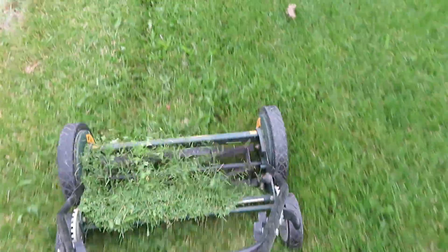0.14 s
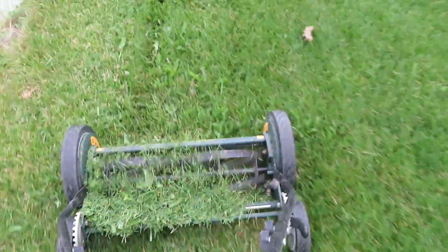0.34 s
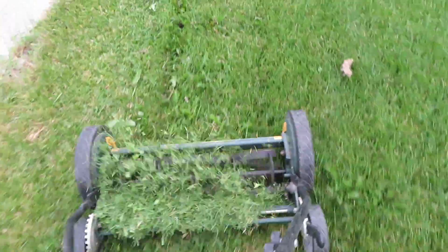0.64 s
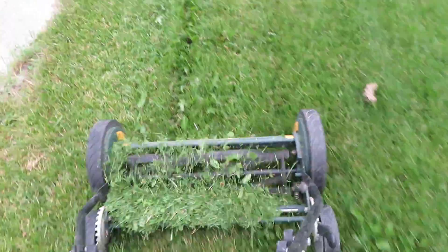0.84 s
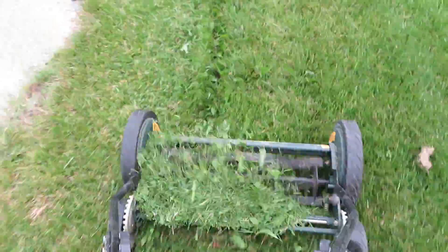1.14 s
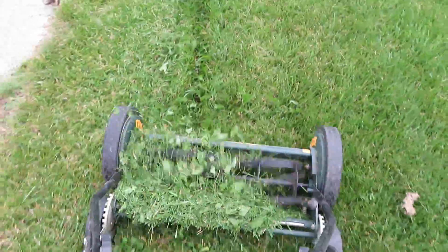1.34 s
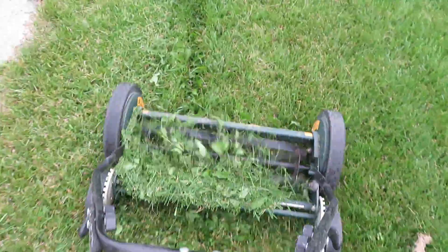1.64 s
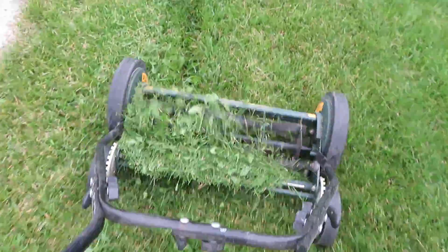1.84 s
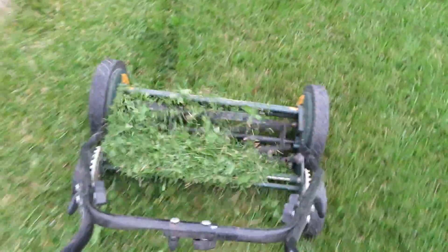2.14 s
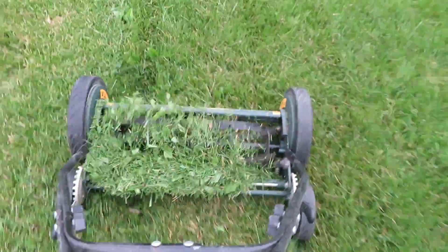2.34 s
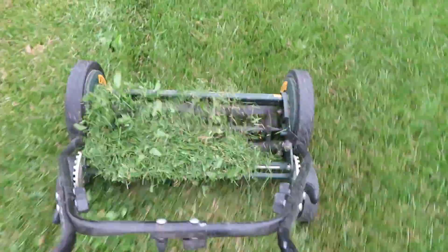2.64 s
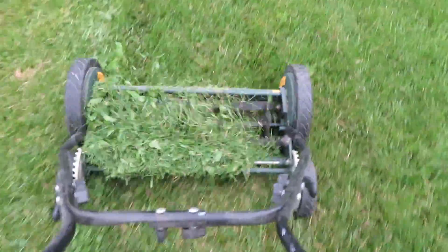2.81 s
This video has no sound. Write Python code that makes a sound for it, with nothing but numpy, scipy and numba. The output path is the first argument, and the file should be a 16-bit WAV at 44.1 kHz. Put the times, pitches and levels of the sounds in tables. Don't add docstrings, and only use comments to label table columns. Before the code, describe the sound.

A hand-pushed reel mower runs continuously over a lawn, heard close from above the handle: a rapid pulsing metallic scrape, crackling cut stems, low wheel rumble and irregular light knocks, dry and open, slowing slightly toward the end.

```python
import sys
import numpy as np
from scipy import signal
from scipy.fft import rfft, irfft, next_fast_len
from scipy.io import wavfile
from scipy.ndimage import uniform_filter1d
from numba import njit

SR = 44100
rng = np.random.default_rng(int(sys.argv[2]) if len(sys.argv) > 2 else 0)


def boost(x):
    u = np.asarray(x, float) / 20
    return 10 ** u


def file_out(sig):
    cols = np.atleast_2d(sig).T
    lim = np.clip(cols, -1, 1)
    pcm = np.round(lim * 32767).astype(np.int16)
    wavfile.write(sys.argv[1], SR, pcm)


N = 130977

# time in seconds, blades passed so far.
BLADES = [
    (0, .05),
    (.5, 8.85),
    (.75, 13.38),
    (1.0, 17.8),
    (1.5, 26.65),
    (2.0, 35.2),
    (2.5, 43.7),
    (2.97, 51.55),
]
BLADES_PER_TURN = 5
# time in seconds, push in dB, grass load in dB, lean on the handle in dB.
PUSH = [(0, 1.5, -1, 7.5), (.17, -0.5, -3.2, 2), (.36, 2.6, -1, 5.5), (.55, 0.1, -3, 2), (.72, 2.2, 0, 4.7),
        (1.0, 1.4, -0.2, -0.5), (1.2, 0.4, -1, 4), (1.42, 0.7, 2, 3), (1.57, 0.7, -3, -0.5),
        (1.78, 3.15, 2.2, 6.5), (2.05, -0.8, -1.9, -4.3), (2.2, 0.5, -2.7, -0.5), (2.4, 0.6, 1.7, 5),
        (2.55, 2.3, 0, -1), (2.72, 2.3, 1, 2), (2.88, -0.5, -1.5, -3), (2.97, -0.5, -1.5, -9)]

# frequency in Hz, width in Hz, level in dB.
BAR = [(250, 40, -6), (340, 130, -2), (430, 60, -4)]
KNIFE = [(489, 83, -7.5), (529.3, 94, 0), (595, 49, 1.5), (652, 10, -8)]
FRAME = [(683, 65, -12), (755, 127, -8.5), (821.4, 31, 2.5), (867.6, 48, 0), (942, 108, -1.5),
         (1070, 133, -4.5), (1108, 52, -8), (1231, 180, -18)]
REEL = [(1460, 120, -13), (1575, 70, -5), (1632, 22, 2), (1730, 50, -10), (1832, 36, -1), (1930, 90, -9),
        (2010, 60, -9), (2070, 12, -3), (2165, 25, -12), (2265, 36, -9)]
SPIDERS = [(2430, 80, -4), (2510, 80, -1), (2600, 90, -3), (2685, 40, -1), (2733, 18, 3), (2830, 30, -7),
           (3005, 90, -11), (3285, 70, -13), (3657, 14, -6), (4150, 90, -14), (4490, 80, -15),
           (5250, 140, -15), (5430, 120, -15), (7250, 250, -18)]
# level in dB, blade phase of the maximum in cycles, throb per blade in dB,
# throb per turn in dB, blade of the turn at the maximum, unevenness in dB.
PARTS = [
    (-41.5, 0.12, 1, 0, 1.3, 1),
    (-25.5, 0.0073, 5.0, 0, 0.71, 0.95),
    (-19, .42, 3, 0.18, 0.4, 0.57),
    (-26, 0.39, 1, 0.5, 1.2, -0.2),
    (-23, 0.41, 2, 0.5, 1.1, 0.84),
]
SCRAPES_PER_S, SCRAPE_SPREAD_DB, SMOOTH_RUB = 1500, 3.0, 0.88
SWEEP, WANDER = 0.23, 0.2
BIGGEST = 3.36

# frequency in Hz, level in dB.
SHEAR = [(250, -43.5), (400, -23), (700, 8), (1400, 0.5), (2200, 16.5), (3200, 12), (4500, 0), (6000, -1.5)]
SHEAR_DB = -27.5

# frequency in Hz, level in dB.
GRASS = [(4200, -0.5), (5900, -8.5), (7200, -6.5), (10200, -8), (12500, -7.5), (13300, -11.5), (14200, -16),
         (15600, -30)]
GRASS_DB, SNIPS_PER_S, SNIP_SPREAD_DB, RUSTLE = -27, 2500, 6, 2.03
GRASS_THROB_DB, GRASS_PHASE, TUFT_DB = 1.6, 0.5, 0.5
PATCH_DB, PATCH_HZ = 1.5, 120

# frequency in Hz, level in dB.
TURF = [(12, -57), (20, -50), (45, -18.5), (91, -12), (162, -8.5), (173, -47), (190, 1), (250, 5),
        (420, -120)]
TURF_DB = -32

HUM_HZ, HUM_WAVER, HUM_DB = 212, 0.014, -38
HUM_BLADE_DB, HUM_PHASE, HUM_TURN_DB, HUM_TURN_AT = 1, 0.077, 3.5, 1.14

# start in seconds, peak in dB.
KNOCKS = [(0.098, -1), (0.3611, -11), (0.4813, -10), (0.5212, -16), (0.5854, -7), (1.0825, -8), (1.277, -2),
          (1.4313, -12), (1.5733, -6), (1.6437, -2), (1.7285, -17), (1.941, 0.5), (2.0602, -1), (2.188, -1),
          (2.362, -8), (2.4668, -3), (2.5333, -3), (2.608, -8), (2.7105, -6), (2.7591, -5), (2.8, 0),
          (2.9248, -16)]
KNOCK_DB, KNOCK_S = 3.5, 0.012
KNOCK_FROM_HZ = 2200

# frequency in Hz, side minus mid in dB.
WIDTH = [(210, -23.5), (420, -13), (560, -52), (2400, -28.5), (4400, -13.5), (8000, -8.5), (9800, -21),
         (13000, -9)]
WIDTH_LAG_S = 0.031
MIC_DIP_HZ, MIC_DIP_WIDTH_HZ, MIC_DIP = 9150, 730, 0.96
TOP_HZ, HEADROOM = 15720, 1.1


def level(x, db):
    return x * boost(db) / np.sqrt(np.mean(x ** 2))


def curve(table, column):
    rows = np.array(table, float)
    return np.interp(np.arange(N) / SR, rows[:, 0], rows[:, column])


def colour(x, points):
    size = next_fast_len(N)
    rows = np.array(points, float)
    hz = np.maximum(np.arange(size // 2 + 1) * SR / size, 1)
    gain_db = np.interp(np.log(hz), np.log(rows[:, 0]), rows[:, 1])
    return irfft(rfft(x, size) * boost(gain_db), size)[:N]


@njit
def svf(x, hz, width):
    y, band, low = np.empty(len(x)), 0., 0.
    for i in range(len(x)):
        g = np.tan(np.pi * hz[i] / SR)
        damping = width / hz[i]
        v = (band + g * (x[i] - low)) / (1 + g * (g + damping))
        band, low = 2 * v - band, low + 2 * g * v
        y[i] = damping * v
    return y


def ring(x, hz, width, skirt):
    hz = hz * np.ones(N)
    return svf(svf(x, hz, width), hz, skirt * width)


def walk(rate):
    hold = int(SR / rate)
    steps = np.repeat(rng.standard_normal(N // 100), hold)[:N]
    steps = uniform_filter1d(uniform_filter1d(steps, hold), hold)
    return 1.51 * (steps - uniform_filter1d(steps, size=4 * hold))


def grit(per_s, spread_db, smooth):
    when = rng.random(N)
    size = np.minimum(rng.exponential(size=N), BIGGEST)
    rub = rng.standard_normal(N)
    sign = np.sign(rub[::-1])
    catches = (when < per_s / SR) * sign * boost(spread_db * size)
    return level(catches, 0) + smooth * rub


def throb(phase, at):
    return np.cos(2 * np.pi * (phase - at))


def turn_throb(blades, at):
    return throb(blades / BLADES_PER_TURN, at / BLADES_PER_TURN)


def metal_part(modes, drive, blades, at, knock_db):
    out = 0
    for k, (hz, width, db) in enumerate(modes):
        shift = width * (SWEEP * throb(blades, at + 0.33) + WANDER * walk(20))
        knock_share = min(hz / KNOCK_FROM_HZ, 1) ** 2
        force = drive * boost(1.94 * walk(25.995) + knock_db * knock_share)
        out = out + (-1) ** k * boost(db) * ring(force, hz + shift, width, 6.1)
    return out


def steel(blades, knock_db, push_db, lean_db):
    out = 0
    bite = walk(16)
    for modes, row in zip((BAR, KNIFE, FRAME, REEL, SPIDERS), PARTS):
        db, at, blade_db, turn_db, turn_at, uneven_db = row
        force_db = blade_db * throb(blades, at) + turn_db * turn_throb(blades, turn_at)
        force_db = force_db + (lean_db if modes is BAR else push_db)
        force_db = force_db + uneven_db * (walk(17) + 0.5 * bite)
        drive = grit(SCRAPES_PER_S, SCRAPE_SPREAD_DB, SMOOTH_RUB) * boost(force_db)
        out = out + level(metal_part(modes, drive, blades, at, knock_db), db)
    rub = grit(SCRAPES_PER_S, SCRAPE_SPREAD_DB, SMOOTH_RUB)
    rub = rub * boost(push_db + knock_db + 1.4 * bite)
    shear = colour(rub, [(100, -6.5)] + SHEAR + [(9000, -19)])
    return out + level(shear, SHEAR_DB)


def grass(blades, load_db):
    out = 0
    tuft_db = load_db + GRASS_THROB_DB * throb(blades, GRASS_PHASE) + TUFT_DB * walk(9.04)
    snips = grit(SNIPS_PER_S, SNIP_SPREAD_DB, RUSTLE)
    for k, hz in enumerate(3000 + 450 * np.arange(29)):
        if k % 6 == 0:
            near, flutter = walk(9.25), walk(40.04)
        patch = ring(snips, hz + PATCH_HZ * walk(30), 410, 0.95)
        patch_db = tuft_db + 0.92 * near + PATCH_DB * walk(34.74) + 1.13 * flutter
        out = out + (-1) ** k * patch * boost(patch_db)
    return level(colour(out, [(2000, -13)] + GRASS), GRASS_DB)


def wheels():
    rumble = rng.standard_normal(N) * boost(1.1 * walk(5.2))
    return level(colour(rumble, TURF + [(400, -24)]), TURF_DB)


def hum(blades, lean_db):
    hz = HUM_HZ * (1 + HUM_WAVER * walk(24.94))
    tone = np.sin(2 * np.pi * np.cumsum(hz) / SR)
    db = lean_db + HUM_BLADE_DB * throb(blades, HUM_PHASE) + 1.6 * walk(18)
    db = db + HUM_TURN_DB * turn_throb(blades, HUM_TURN_AT)
    return level(tone * boost(db), HUM_DB)


def knocks():
    t, rows = np.arange(N) / SR, np.array(KNOCKS, float)
    sizes = boost(rows[:, 1] - rows[:, 1].mean())
    total = 0
    for start, size in zip(rows[:, 0], sizes):
        total = total + size * (t > start) * np.exp(-np.maximum(t - start, 0) / KNOCK_S)
    return KNOCK_DB * total


def scene():
    blades = curve(BLADES, 1)
    push_db, load_db, lean_db = [curve(PUSH, column) for column in (1, 2, 3)]
    knock_db = knocks()
    mid = steel(blades, knock_db, push_db, lean_db) + grass(blades, load_db + 0.54 * knock_db)
    mid = mid + wheels() + hum(blades, lean_db)
    side = colour(np.roll(mid, int(WIDTH_LAG_S * SR)), WIDTH)
    return np.array([mid + side, mid - side])


def roll_off(x):
    return signal.sosfilt(signal.butter(12, 15970, fs=SR, output="sos"), x)


def record(dry):
    heard = []
    for channel in HEADROOM * np.tanh(dry / HEADROOM):
        dipped = channel - MIC_DIP * svf(channel, MIC_DIP_HZ * np.ones(N), MIC_DIP_WIDTH_HZ)
        heard.append(colour(dipped, [(TOP_HZ, 0), (TOP_HZ + 90, -70)]))
    return roll_off(np.array(heard))


dry = scene()
out = record(dry)
file_out(out)
```